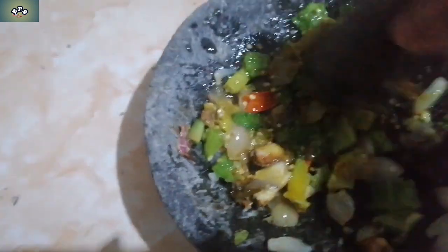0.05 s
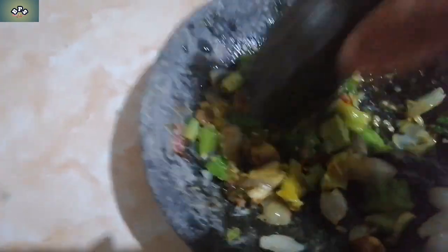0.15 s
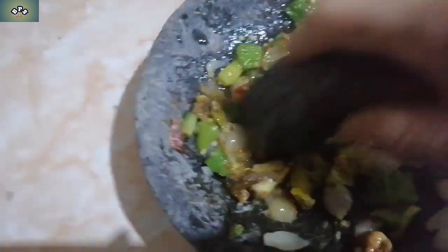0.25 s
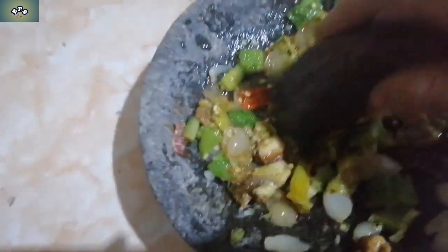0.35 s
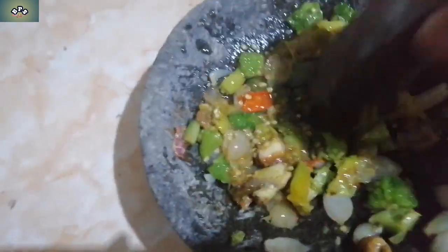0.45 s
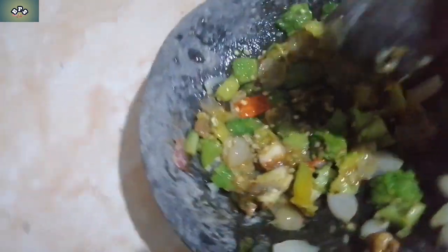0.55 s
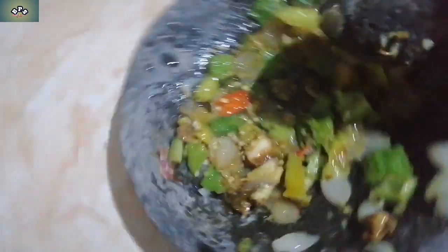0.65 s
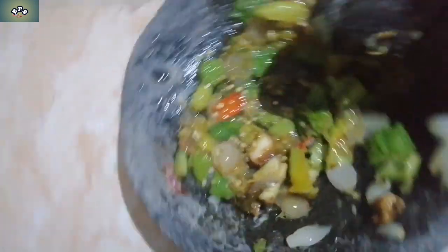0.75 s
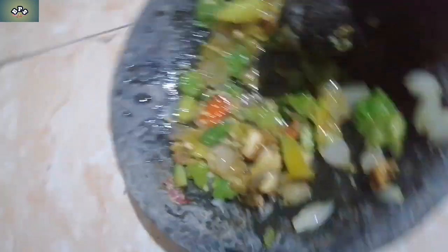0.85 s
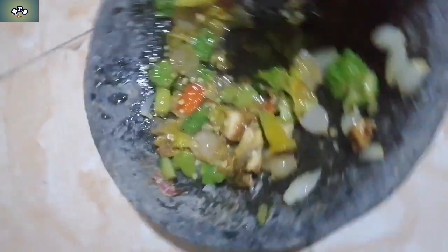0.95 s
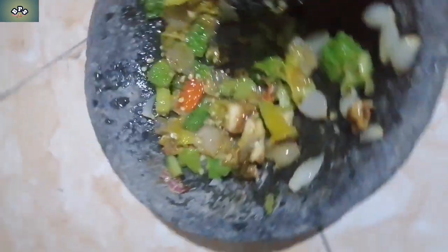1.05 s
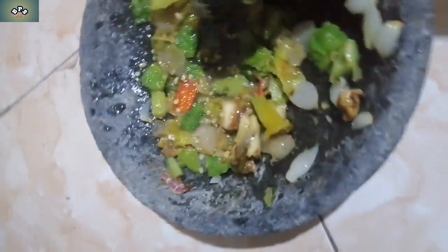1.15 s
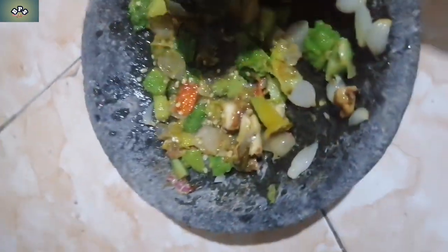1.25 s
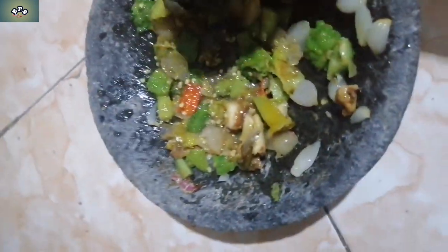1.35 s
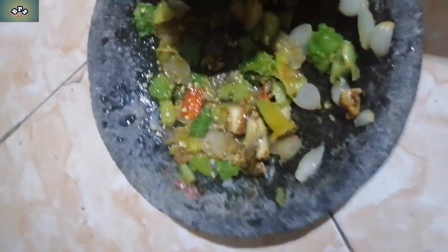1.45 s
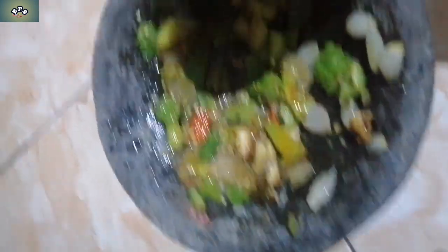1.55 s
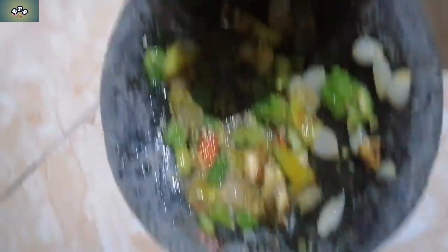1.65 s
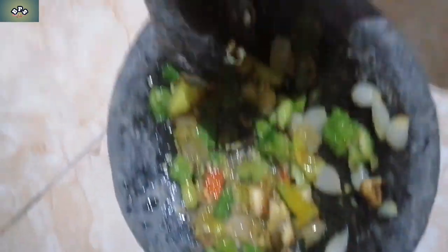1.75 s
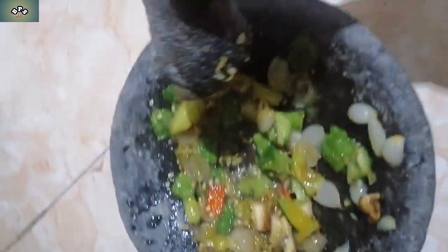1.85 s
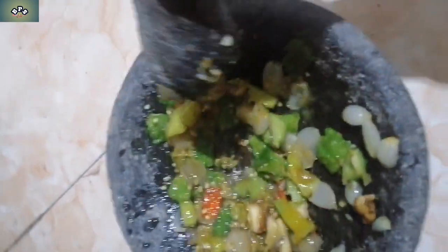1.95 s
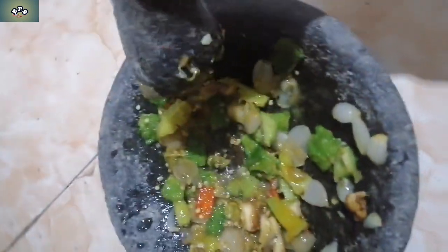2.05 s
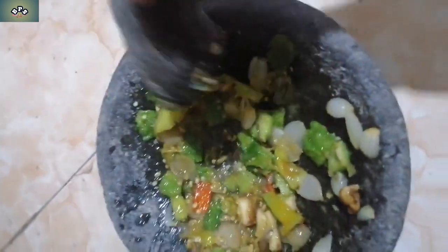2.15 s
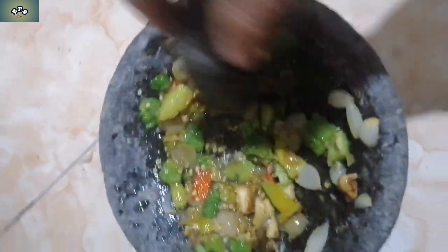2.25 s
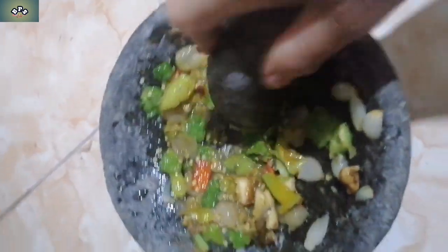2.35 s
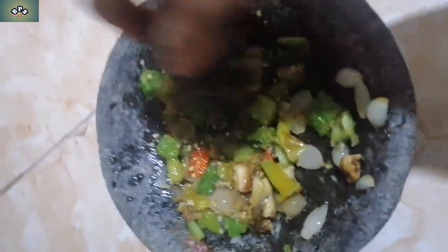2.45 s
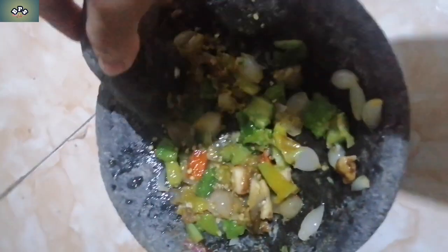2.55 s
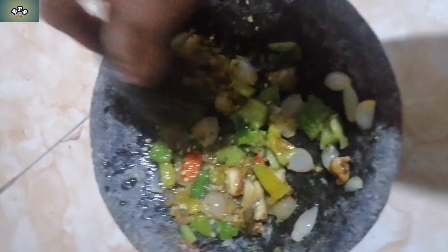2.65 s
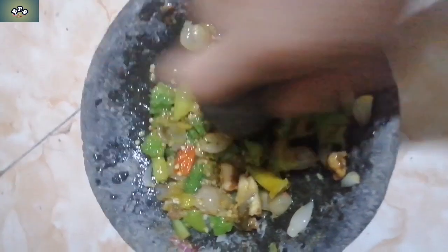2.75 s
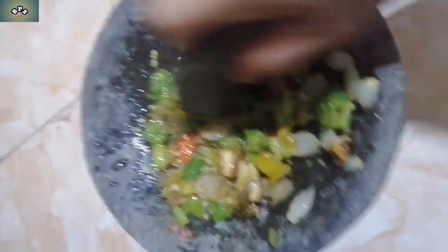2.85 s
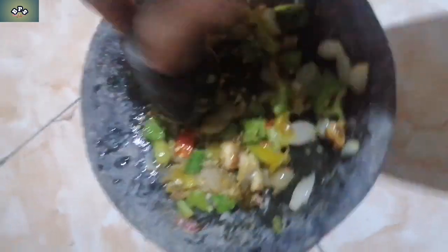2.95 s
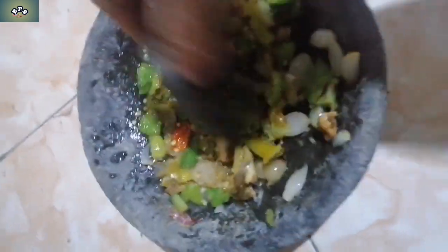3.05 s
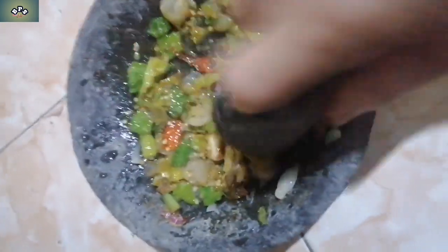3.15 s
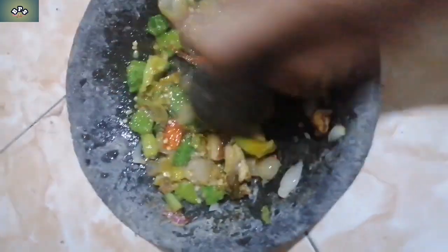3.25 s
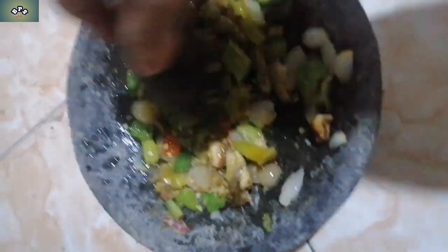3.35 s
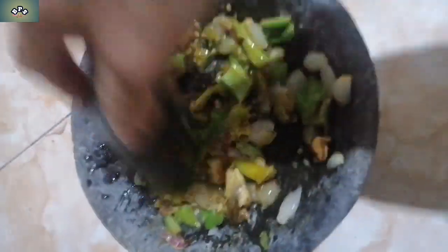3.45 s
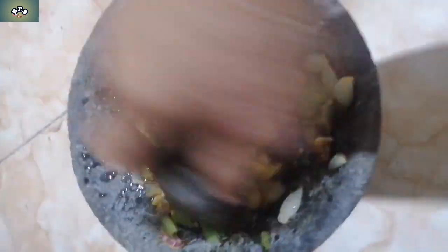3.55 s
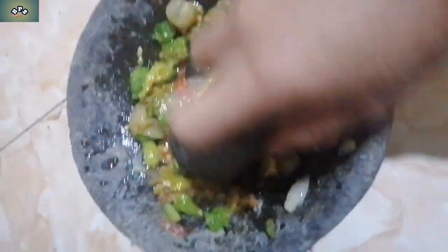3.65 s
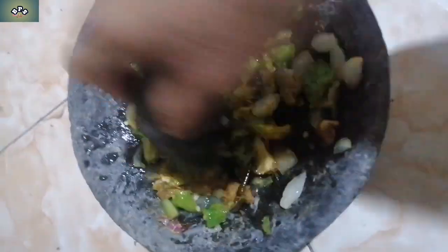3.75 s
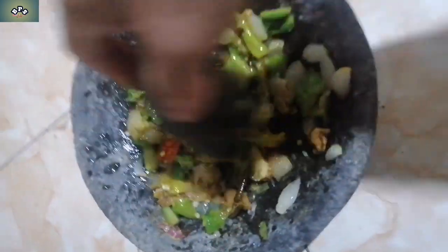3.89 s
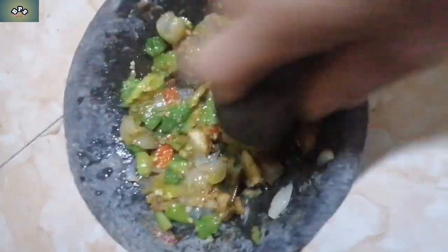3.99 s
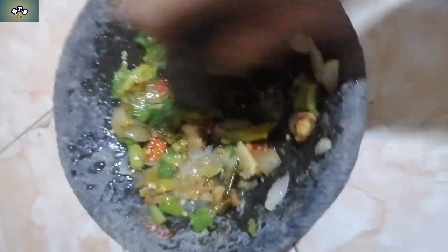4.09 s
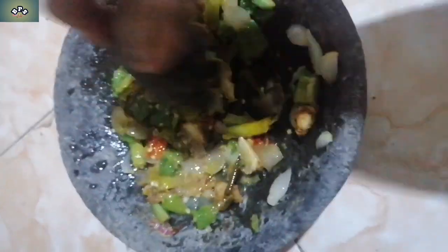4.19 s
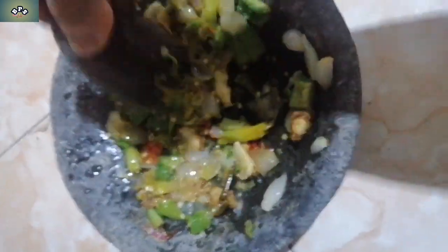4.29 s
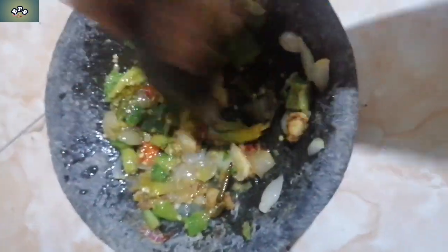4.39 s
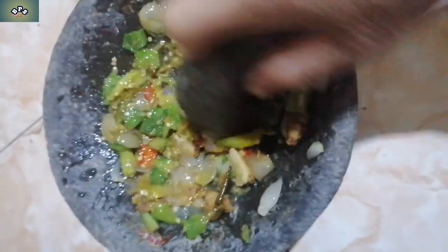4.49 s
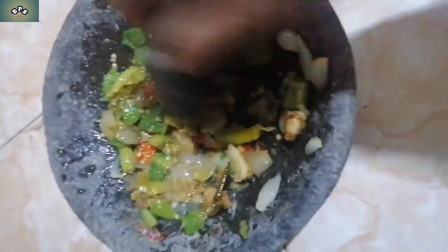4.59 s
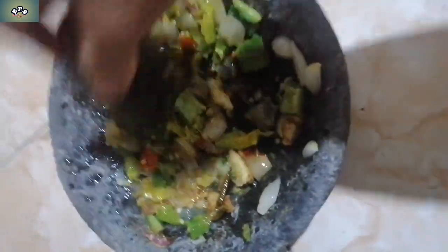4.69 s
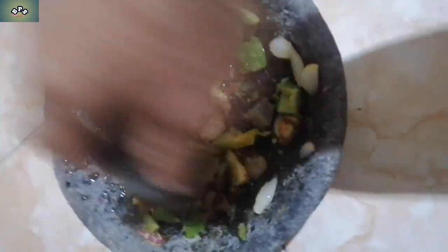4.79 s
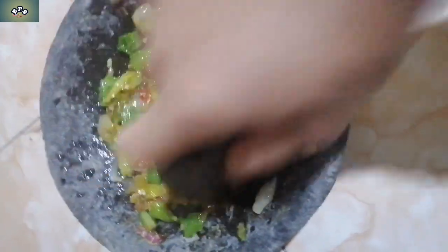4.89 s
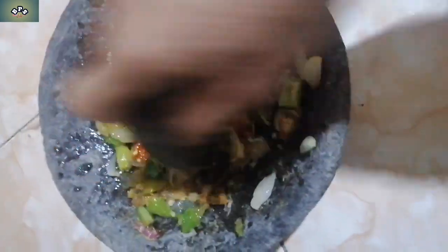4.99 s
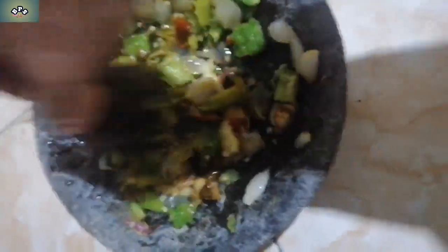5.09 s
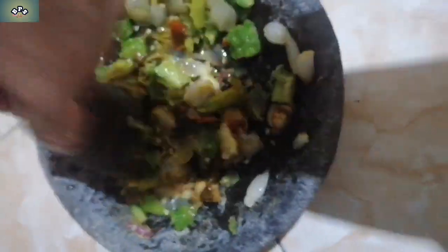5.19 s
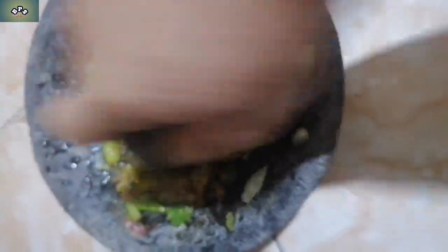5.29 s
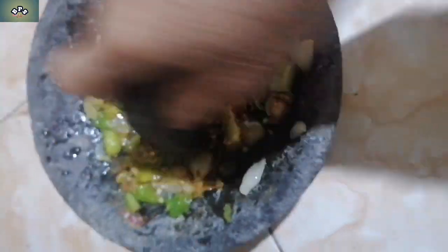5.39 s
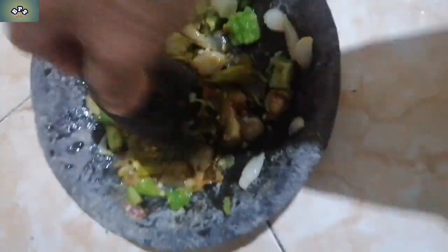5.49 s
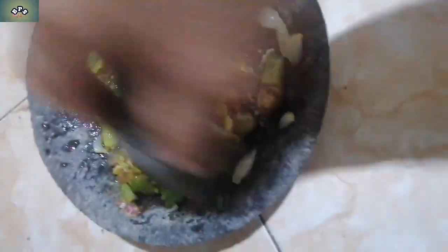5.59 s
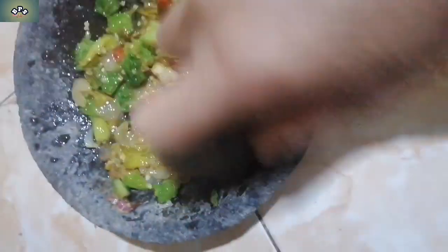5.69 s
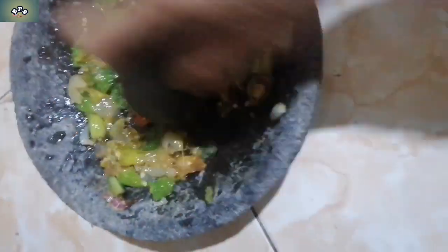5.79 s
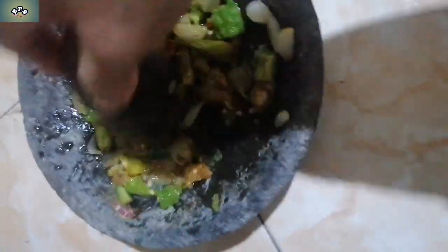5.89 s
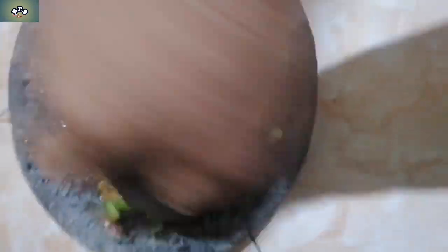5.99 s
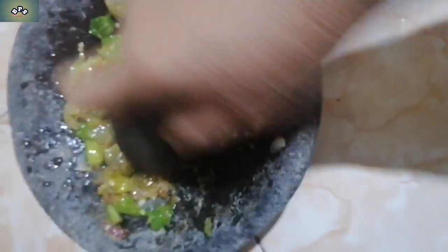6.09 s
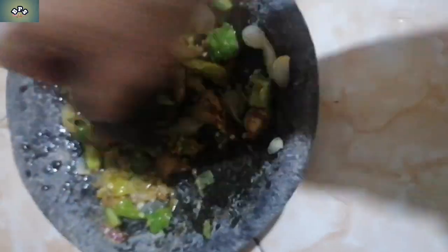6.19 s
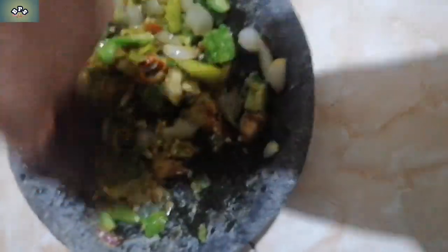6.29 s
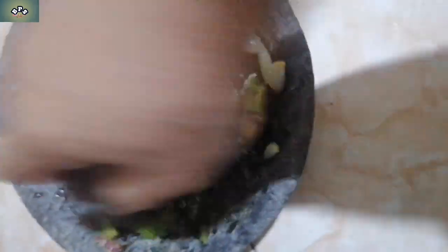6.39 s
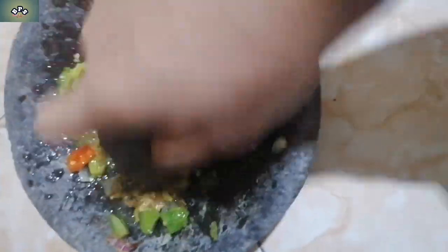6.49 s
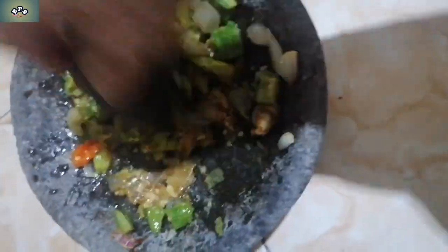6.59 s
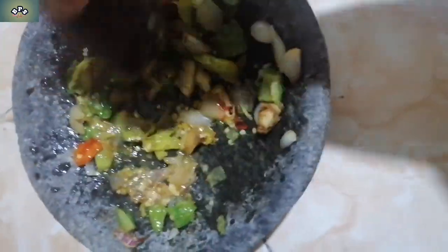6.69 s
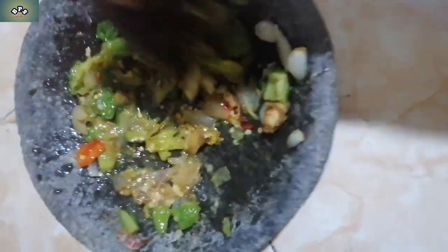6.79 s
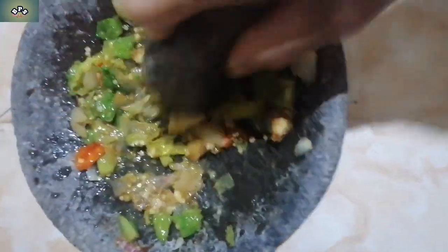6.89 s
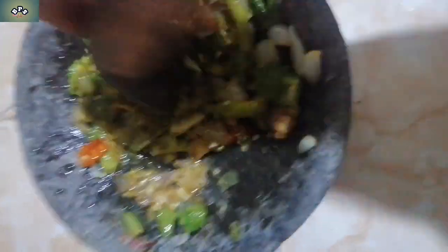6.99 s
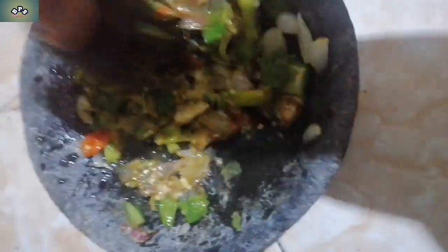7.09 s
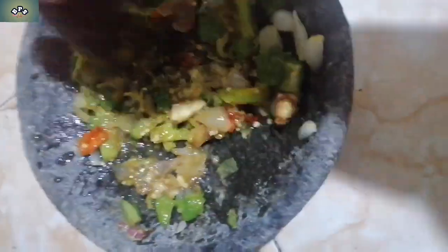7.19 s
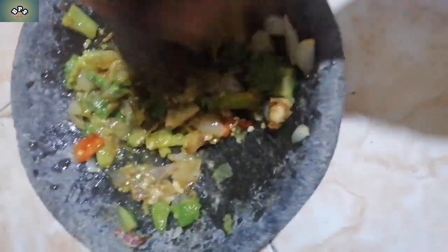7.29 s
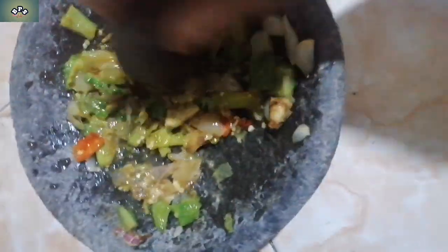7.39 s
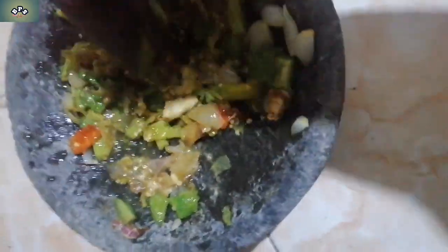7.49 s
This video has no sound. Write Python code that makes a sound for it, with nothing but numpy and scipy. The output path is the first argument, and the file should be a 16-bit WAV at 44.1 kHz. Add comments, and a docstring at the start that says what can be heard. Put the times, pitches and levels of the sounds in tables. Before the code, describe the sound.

Close up in a small reverberant kitchen, food is crushed in a stone bowl. After a brief opening crunch and knocks there is a long gap filled by soft hiss and throbbing low hum. Then uneven pounding resumes: bright wet snaps, low woody-sounding stone thuds, slipping double and triple hits, small squeaks of wet skin, the bowl juddering on the floor, ending with light strokes.

```python
"""Wet crunches and stony knocks in a small hard room: a pestle pounds chillies, garlic and shallots
in a stone mortar on a tiled floor. Each stroke crushes with clusters of tiny filtered snaps, then knocks
on the stone, often several times as it slips; each knock is a set of decaying modes with a gritty crack.
Echoes and a noise tail with ringing bass notes make the room. Underneath lie a faint hiss of shaped noise
and a low throbbing rumble of steady sines."""
import sys
import numpy as np
from scipy import signal
from scipy.fft import rfft, irfft
from scipy.io import wavfile
from scipy.ndimage import uniform_filter1d

SR = 44100
rng = np.random.default_rng(int(sys.argv[2]) if len(sys.argv) > 2 else 0)


def output_pcm(signal):
    """Save a mono or channel-first signal as 16-bit PCM at the path in sys.argv[1].

    Samples are clipped to [-1, 1] before scaling.
    """
    pcm = np.clip(np.atleast_2d(signal).T, -1, 1) * 32767
    wavfile.write(sys.argv[1], SR, np.round(pcm).astype(np.int16))


N = 332514  # samples, about 7.5 s

# Background noise colour. Each row: frequency in Hz, relative level in dB per Hz.
NOISE_COLOUR = [(15, -4), (48, -2), (70, -1.5), (100, -6), (200, -1.5), (320, -15), (750, -15),
                (1150, -24.5), (2800, -28), (3800, -36.5), (7000, -30.5), (8300, -26.5), (10000, -26.5),
                (11600, -37.5), (16000, -44.5)]
# Likeness of the background noise on both sides. Each row: frequency in Hz, shared part of the power (0 to 1).
NOISE_LIKENESS = [(100, 0.82), (600, 0.38), (4000, 0.071)]
# Steady low notes. Each row: frequency in Hz, rms level in dB.
HUM_NOTES = [(27, -64.5), (36.4, -63), (157.5, -71)]

# Standing waves of the room. Each row: frequency in Hz, relative level in dB, time to fall 60 dB in seconds.
STANDING_WAVES = [(159.2, 1, 1), (202, -8.5, 1), (228.6, 0, 0.84), (286, 5, 1), (365, -3.5, 1),
                  (461, 13, 0.067)]
# Echoes off floor and near walls. Each row: delay in seconds, relative left gain, relative right gain.
EARLY_ECHOES = [(.0046, 0.083, 0.19), (.0092, 0.1, 0.072), (0.011, .10, 0.25), (0.0145, 0.16, .13)]
# Decay of the room tail. Each row: frequency in Hz, time to fall 60 dB in seconds.
TAIL_DECAY = [(120, 0.68), (320, 0.7), (840, 0.82), (2200, 0.72), (5800, 0.51), (15000, 0.091)]
# Colour of the room tail. Each row: frequency in Hz, relative level in dB.
TAIL_COLOUR = [(80, -13), (200, 4.5), (450, -0.5), (900, -5), (1600, -0.5), (3100, 3.5), (7000, 2.5),
               (15000, 6)]

# The mortar rocks on the tiles. Each row: start in seconds, length in seconds, level in dB before the room.
ROCKS = [(2.399, 0.084, -37), (3.74, 0.13, -26.5), (4.037, 0.033, -31), (4.127, 0.08, -31.5),
         (4.458, 0.086, -44), (4.933, .04, -32)]
# The bowl's place before the microphones. Each row: time in seconds, left over right in dB.
BOWL_PLACE = [(.4, 3.5), (2.65, 4.5), (3.35, 9.5), (3.7, 11.5), (4.1, 14), (5, 7), (5.75, 4), (6.2, 10),
              (7.3, 12)]

# Colour of the bursting cells. Each row: frequency in Hz, relative level in dB.
CELL_COLOUR = [(900, -27), (2000, 0), (3100, 0), (4200, -11), (5200, -5.5), (6000, -8.5), (6650, -3.5),
               (7080, 0.5), (7550, -8), (8000, -7), (10800, -14.5), (13400, -9.5), (15000, -9),
               (16500, -24)]
# Wet skin squeaks under the pestle. Each row: middle in seconds, level in dB before the room.
SKIN_SQUEAKS = [(4.956, -38.5), (5.3125, -22.5), (5.4638, -32.5)]
# Pushes through the food. Each row: skin splits in seconds, piece gives way in seconds, half length of
# the giving way in seconds, then the levels of nudging, split, mashing and giving way in dB before the room,
# centre pitch in Hz, left over right in dB.
PUSHES = [(0.008, 0.055, 0.0098, -51, -43, -58, -50.5, 4430, 0),
          (0.319, 0.381, 0.013, -69, -42.5, -71, -42, 5660, -1),
          (2.3968, 2.504, .03, -82, -28, -56, -52.5, 5840, -2.5),
          (2.799, 2.948, .013, -55.5, -52, -56.5, -39, 6700, -2),
          (3.217, 3.339, 0.027, -61, -49, -52, -43, 5600, 1),
          (3.619, 3.718, .018, -68, -35.5, -55.5, -39.5, 5840, 8),
          (4.056, 4.205, 0.018, -62, -43, -47.5, -45, 5600, 1.5),
          (4.438, 4.547, 0.011, -55, -36, -46, -39, 5450, 7),
          (4.937, 4.995, .03, -69, -42, -63, -51.5, 6800, -1),
          (5.3116, 5.463, 0.0071, -62, -33, -54, -44, 7300, -1),
          (5.757, 5.852, 0.023, -62, -46.5, -44.5, -48.5, 5700, -1),
          (6.094, 6.165, .036, -80, -48, -63, -40, 7000, 20),
          (6.458, 6.568, 0.033, -61, -38.5, -62, -46.5, 5800, 1),
          (6.871, 6.931, 0.0082, -51.5, -47, -56, -40.5, 5900, 2),
          (7.274, 7.384, 0.015, -51, -50, -55.5, -36, 5900, -2.5)]

# Pestle meets stone. Each row: time in seconds, level in dB before the room, hardness of the contact in dB.
STONE_KNOCKS = [(0.3259, -21.5, -5), (0.3552, -26, 1.5), (0.398, -17, -4), (2.3997, -33.5, -14),
                (2.6476, -16, 3), (3.0145, -21.5, -7.5), (3.237, -35.5, 2.5), (3.2484, -33.5, -21),
                (3.2795, -31, 1), (3.35, -17.5, -4), (3.637, -26, -13), (3.6671, -27, -11), (3.73, -16, -7),
                (3.7397, -21, -3.5), (3.7891, -22, -9), (4.0607, -24.5, -4), (4.0833, -25, -11),
                (4.0982, -20, -7), (4.1282, -17.5, -2.5), (4.459, -26, -9.5), (4.595, -15, -6.5),
                (4.9406, -20, -3.5), (4.9721, -30.5, 1), (4.9835, -22.5, -3), (5.0365, -20.5, -7),
                (5.345, -33, 0), (5.4541, -19, -3), (5.719, -13, 2.5), (5.7848, -24, -1),
                (5.844, -25.5, -10), (6.1032, -26, 2), (6.1572, -27.5, -6), (6.1945, -30, -12),
                (6.205, -20, -6.5), (6.2304, -31.5, -14), (6.4687, -28.5, 0), (6.508, -26.5, -8),
                (6.5685, -31, -1.5), (6.6046, -27, -8), (7.2857, -29.5, -8)]
# Mortar and pestle, damped by food, hand and floor. Each row: frequency in Hz, relative level in dB,
# time to fall 60 dB in seconds, left over right in dB.
STONE_MODES = [(209, -6, 0.05, 3), (335.6, -2, 0.022, -1), (480, 6, 0.01, -6), (734, 4, 0.018, -2),
               (977.4, 2.5, 0.04, 9), (1547, -13, 0.055, -17), (2000, -14.5, 0.009, -10),
               (3068, -26, 0.029, -13), (4930, -25.5, 0.0097, -3)]
# How freely the grip lets the high notes ring. Each row: time in seconds, boost in dB.
GRIP = [(.4, 3), (2.65, -1.5), (3.3, 2), (4.94, 7.5), (5.45, -6), (5.72, 8.5), (6.47, 9), (7.3, 12)]

EDGE_HZ = 16200  # top of the band
ROCK_HZ, ROCK_WAVER_HZ = 210, 28.2  # low note of the bowl on the floor and its random spread
ROCK_RISE = 0.22  # share of the length spent rising
FIRM_PITCH, JUICY_PITCH = 0.84, 1.04  # times the centre pitch: firm flesh crunches lower than juice squirts
NUDGE_HALF_S = 0.03  # half length of the rustle as the pestle first pushes loose pieces aside
SPLIT_HALF_S = 0.006  # half length of the burst of the skin
MASH_MIDDLE, MASH_SPREAD = 0.6, 0.55  # middle and half length, as shares of the time from split to giving way
SPLIT_FOCUS_DB, MASH_FOCUS_DB = 4.5, 6  # how tightly the sound gathers round its pitch: a split is broader
# the pestle slides on through the paste, quieter than the giving way: delay, half length, relative level
DRAG_AFTER_S, DRAG_HALF_S, DRAG_DB = 0.11, 0.08, -27.5
# the pieces shift faintly while the hand rests: start, half length, level before the room, pitch
SETTLE_S, SETTLE_HALF_S, SETTLE_DB, SETTLE_HZ = 0.88, 0.15, -71, 4670
# blows lighter than HEAVY_DB, and those with food still under them, thump more
HEAVY_DB, THUMP_PER_DB, CUSHION_DB = -17, 0.5, 1


def gain_of(db):
    """Decibels to amplitude."""
    return 10 ** (np.asarray(db) / 20)


def evened(x):
    """Scales to rms 1."""
    return x / np.sqrt(np.mean(x ** 2) + 1e-20)


def read(points, hz):
    """Reads a table on a log-frequency axis."""
    f, value = np.transpose(points)
    return np.interp(np.log(hz + 1), np.log(f + 1), value)


def at_time(curve, s):
    """Reads a table that moves over time."""
    return np.interp(s, *np.transpose(curve))


def band(x, low_hz, high_hz):
    """Keeps one band of a sound."""
    return signal.sosfilt(signal.butter(2, [low_hz, high_hz], "band", fs=SR, output="sos"), x)


def smoothed(x, time_s):
    """Follows a signal with an exponential lag."""
    keep = np.exp(-1 / (time_s * SR))
    return signal.lfilter([1 - keep], [1, -keep], x)


def add(mix, s, sound):
    """Mixes a stereo sound in at time s."""
    start = round(s * SR)
    sound = sound[:, max(-start, 0):]
    part = mix[:, max(start, 0):][:, :sound.shape[1]]
    part += sound[:, :part.shape[1]]


def placed(side_db):
    """Left and right gains of constant power."""
    pair = gain_of(np.array([[side_db], [-side_db]]) / 2)
    return evened(pair)


def causal(db):
    """Minimum-phase impulse response with the given gain on an rfft grid, starting at once."""
    log_gain = np.log(gain_of(np.r_[db, db[-2:0:-1]]))
    return np.fft.ifft(np.exp(np.conj(signal.hilbert(log_gain)))).real


def partly_shared(same, spectra):
    """Blends the third noise into the first two, so that left and right share part of their power."""
    return np.sqrt(same) * spectra[2] + np.sqrt(1 - same) * spectra[:2]


def background(noise_db=-58.0, waver=0.135):
    """Steady room noise and a low hum whose close lines beat into a throb."""
    hz, t = np.fft.rfftfreq(N, 1 / SR), np.arange(N) / SR
    spectra = rfft(rng.standard_normal((3, N)))
    same = np.clip(read(NOISE_LIKENESS, hz), 0, 1)
    noise = irfft(partly_shared(same, spectra) * gain_of(read(NOISE_COLOUR, hz)), N)
    drift = np.interp(t, np.linspace(0, t[-1], 16), rng.standard_normal(16))
    hum = np.zeros(N)
    for k, (note_hz, db) in enumerate(HUM_NOTES):
        phase = waver * drift * (k + 3)
        hum += gain_of(db) * np.sqrt(2) * np.sin(2 * np.pi * note_hz * t + phase)
    return gain_of(noise_db) * evened(noise) + hum


def room_tail(build_s=0.0013, standing_db=-7):
    """Dense reflections dying band by band, with a few bass notes that ring on."""
    t = np.arange(SR) / SR
    hz, frame_s, spectra = signal.stft(rng.standard_normal((3, SR)), SR, nperseg=512)
    same = (1 / (1 + (hz / 520) ** 2))[:, None]  # long waves reach both sides alike
    fall_db = 60 * frame_s / read(TAIL_DECAY, hz)[:, None]
    spectra = partly_shared(same, spectra) * gain_of(read(TAIL_COLOUR, hz)[:, None] - fall_db)
    tail = signal.istft(spectra, SR, nperseg=512)[1][:, :SR]
    for mode_hz, db, t60 in STANDING_WAVES:
        phase = 2 * np.pi * rng.random() + rng.standard_normal((2, 1)) / 2
        ring = np.sin(2 * np.pi * mode_hz * t + phase) / 10
        tail = tail + gain_of(standing_db + db - 60 * t / t60) * ring
    tail *= 1 - np.exp(-(t / build_s) ** 2)
    return tail / np.sqrt(np.sum(tail ** 2) / 2)


def room(x, wet_db, echo_db, wet_side_db, spacing_s=0.00042, count=3):
    """Direct sound, early echoes and the tail, a slow regular exchange between several dense tails."""
    out = x.copy()
    for k, (delay_s, left, right) in enumerate(EARLY_ECHOES):
        lead_s = (-1) ** k * spacing_s / 2  # left and right take turns to come first
        add(out, delay_s - lead_s, gain_of(echo_db) * np.array([[left], [0]]) * x[0])
        add(out, delay_s + lead_s, gain_of(echo_db) * np.array([[0], [right]]) * x[1])
    turn = np.arange(N) / SR * 0.805  # half cycles of the exchange
    for k in range(count):
        share = np.cos(np.pi * (turn + k / count)) * np.sqrt(2 / count)
        tail = signal.fftconvolve((x.mean(0) * share)[None], room_tail(), axes=1)[:, :N]
        out += gain_of(wet_db) * placed(wet_side_db) * tail
    return out


def rock(length_s, level_db, count=8):
    """The bowl judders on the floor: a low unsteady note that swells quickly and dies."""
    u = np.linspace(0, 1, int(length_s * SR))
    hz = ROCK_HZ + ROCK_WAVER_HZ * np.interp(u, np.linspace(0, 1, count), rng.standard_normal(count))
    envelope = np.minimum(u / ROCK_RISE, 1) * (1 - u)
    return gain_of(level_db) * envelope * np.sin(2 * np.pi * np.cumsum(hz) / SR)


def push(crushing, push_db=-5):
    """The force that bursts the food also shoves the mortar against the floor: a soft low bump."""
    return gain_of(push_db) * band(abs(crushing).mean(0), 150, 330)


def snap(centre_hz, patchy_db, focus_db=7.5):
    """The ring of one bursting piece: the common colour round a pitch, with peaks of its own on each side."""
    hz = np.fft.rfftfreq(1024, 1 / SR)
    bumps = uniform_filter1d(rng.standard_normal((3, len(hz))), size=8)
    common, left, right = evened(uniform_filter1d(bumps, size=8))
    octaves = np.log2((hz + 1) / centre_hz)
    colour_db = read(CELL_COLOUR, hz) - focus_db * np.log(1 + (2 * octaves) ** 2 * 2)
    pair = np.array([causal(colour_db + patchy_db * (common + own / 2)) for own in (left, right)])
    lag = rng.integers(0, 9, 2)  # samples: the paths to the two microphones differ
    delayed = np.array([np.roll(side, k) for side, k in zip(pair, lag)])
    return evened(delayed) / np.sqrt(pair.shape[1])


def wet_ticks(crushing, linger_s=0.045, tick_db=21, spread_db=4):
    """Stirred by the crushing, paste settles and peels off the stone in ticks, each at its own pitch."""
    per_s, patchy_db = 110, 5
    stirred = smoothed(abs(crushing).mean(0), linger_s)
    out = np.zeros((2, N))
    for at in rng.integers(0, N, N * per_s // SR):
        size = gain_of(tick_db + spread_db * min(rng.exponential(), 3))
        add(out, at / SR, size * stirred[at] * snap(rng.uniform(5600, 6360), patchy_db))
    return out


def squeak(level_db, hz=7100, half_s=0.0064):
    """Wet skin sticks and slips on the stone, too briefly to hold a steady pitch."""
    size = int(2 * half_s * SR)
    waver = np.convolve(rng.standard_normal(size), np.ones(20) / 20, "same")
    slips = np.sin(2 * np.pi * np.cumsum(hz * (1 + waver / 6)) / SR)
    # the right microphone is nearer and hears it first
    pair = np.array([np.roll(slips, 1) / 2, slips * np.sqrt(2)])
    return gain_of(level_db) * signal.windows.hann(size) * pair


def crush(half_s, level_db, centre_hz, side_db, focus_db, count=9):
    """A swelling cluster of tiny snaps as cell walls burst and juice squirts, piece after piece."""
    size = int(2 * half_s * SR) + 8
    cells_per_s, spread_db, patchy_db = 5000, 5, 3
    strength = gain_of(spread_db * np.minimum(rng.exponential(1, size), 4.5))
    snaps = (rng.random(size) < cells_per_s / SR) * strength
    drive = signal.windows.hann(size) * snaps * rng.choice([-1, 1], size)
    # the pieces burst in turn, overlapping at random
    order = np.linspace(0, count, size) + rng.standard_normal(size)
    piece = np.clip(order, 0, count - 1).astype(int)
    out = 0
    for k in range(count):
        own_drive = (drive * (piece == k))[None]
        out = out + signal.fftconvolve(own_drive, snap(centre_hz, patchy_db, focus_db), axes=1)
    return gain_of(level_db) * placed(side_db) * out / np.sqrt(np.sum(out ** 2) / size)


def stroke(split_s, give_s, give_half_s, nudge_db, split_db, mash_db, give_db, hz):
    """Nudge, split, mash, give way, slide on: (middle s, half length s, dB, centre Hz, focus dB) of each."""
    press_s = give_s - split_s
    mash_s = split_s + MASH_MIDDLE * press_s
    firm_hz, juicy_hz = hz * FIRM_PITCH, hz * JUICY_PITCH
    return [(split_s - NUDGE_HALF_S / 3, NUDGE_HALF_S, nudge_db, firm_hz, MASH_FOCUS_DB),
            (split_s, SPLIT_HALF_S, split_db, hz, SPLIT_FOCUS_DB),
            (mash_s, MASH_SPREAD * press_s, mash_db, firm_hz, MASH_FOCUS_DB),
            (give_s, give_half_s, give_db, juicy_hz, MASH_FOCUS_DB),
            (give_s + DRAG_AFTER_S, DRAG_HALF_S, give_db + DRAG_DB, juicy_hz, MASH_FOCUS_DB)]


def thump(s, level_db):
    """How much of a blow goes into the floor rather than into ringing the stone, in dB."""
    cushioned = any(split_s < s < give_s for split_s, give_s, *_ in PUSHES)
    return THUMP_PER_DB * (HEAVY_DB - level_db) + CUSHION_DB * cushioned


def knock(level_db, hard_db, thump_db, side_db, loose_db, detune=0.04, contact_s=0.0011, hard_reach=1.23,
          thump_share=0.82, grit_db=-26, grit_reach=0.33, paste_damping=0.15):
    """One blow rings the stone: a bare contact wakes the high modes, a cushioned one only thumps."""
    t = np.arange(SR // 8) / SR
    out = np.zeros((2, len(t)))
    for k, (hz, db, t60, mode_side_db) in enumerate(STONE_MODES):
        hard = hard_reach * np.clip(np.log2(hz / 800), 0, 1)
        soft = thump_share * np.clip(np.log2(560 / hz), 0, 1)
        # a loose grip frees the highest modes; paste under the pestle mutes the middle ones
        free_db = loose_db * (hz > 2500) - paste_damping * thump_db * (600 < hz < 1200)
        mode_db = db + free_db + hard * hard_db + soft * thump_db
        # the point of contact shifts each mode a little; neighbouring modes start in opposite directions
        struck_hz = hz * (1 + detune * rng.standard_normal((2, 1)))
        ring = (-1) ** k * np.sin(2 * np.pi * struck_hz * t)
        out += placed(side_db + mode_side_db) * gain_of(mode_db - 60 * t / t60) * ring
    # the grainy stone faces crack against each other
    grit_t60 = 0.035
    grit = band(rng.standard_normal(out.shape), 1280, 2100)
    out += evened(grit) * gain_of(grit_db + grit_reach * hard_db - 60 * t / grit_t60)
    out *= np.sin(np.pi / 2 * np.minimum(t / contact_s, 1)) ** 2  # the force builds up through the paste
    return gain_of(level_db) * out / np.sqrt(np.mean(out[:, :SR // 125] ** 2))  # levelled on its first 8 ms


def scene(low_cut_hz=115):
    """Knocks and crushing in the room, over the background."""
    stone, food = np.zeros((2, 2, N))
    for s, level_db, hard_db in STONE_KNOCKS:
        side_db, loose_db = at_time(BOWL_PLACE, s), at_time(GRIP, s)
        add(stone, s, knock(level_db, hard_db, thump(s, level_db), side_db, loose_db))
    for *press, side_db in PUSHES:
        for s, half_s, level_db, centre_hz, focus_db in stroke(*press):
            add(food, s - half_s, crush(half_s, level_db, centre_hz, side_db, focus_db))
    add(food, SETTLE_S, crush(SETTLE_HALF_S, SETTLE_DB, SETTLE_HZ, 0, MASH_FOCUS_DB))
    for s, level_db in SKIN_SQUEAKS:
        chirp = squeak(level_db)
        add(food, s - chirp.shape[1] / 2 / SR, chirp)
    for s, length_s, level_db in ROCKS:
        add(stone, s, placed(at_time(BOWL_PLACE, s)) * rock(length_s, level_db))
    # a bowl this small radiates little deep bass
    low_cut = signal.butter(2, low_cut_hz, "high", fs=SR, output="sos")
    stone = signal.sosfilt(low_cut, stone + push(food))
    stone = gain_of(-2.5) * room(stone, wet_db=-1.0, echo_db=4.5, wet_side_db=2.0)
    food = gain_of(-1.36) * room(food + wet_ticks(food), wet_db=-7, echo_db=0.5, wet_side_db=0.0)
    return stone + food + background()


def record(dry, threshold_db=-32, squeeze=0.058, recover_db_per_s=16):
    """Gentle gain control dips the hiss after each knock and lets it creep back; then the band limit."""
    power_db = 10 * np.log10(abs(uniform_filter1d((dry ** 2).mean(0), size=256)) + 1e-12)
    # the held peak level sinks steadily until a louder sound lifts it
    fall_db = np.arange(N) * recover_db_per_s / SR
    held_db = np.maximum.accumulate(power_db + fall_db) - fall_db
    over_db = np.maximum(held_db - threshold_db, 0)
    # the first crack slips through before the gain falls
    ducked = dry / gain_of(squeeze * smoothed(over_db, 0.0068))
    low_pass = signal.firwin(255, EDGE_HZ, window=("kaiser", 9), fs=SR)
    return signal.oaconvolve(ducked, low_pass[None], "same")


dry = scene()
out = record(dry)
output_pcm(out)
```